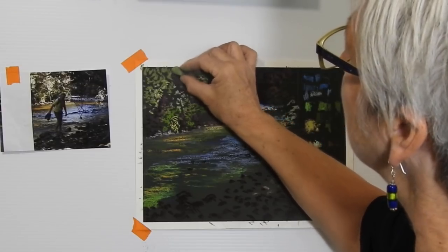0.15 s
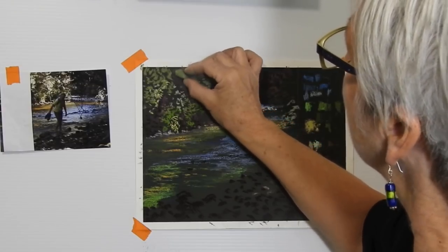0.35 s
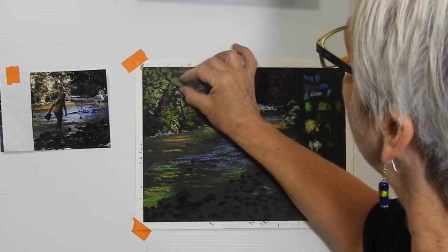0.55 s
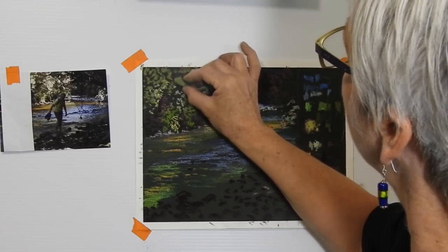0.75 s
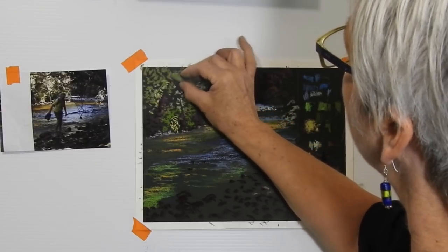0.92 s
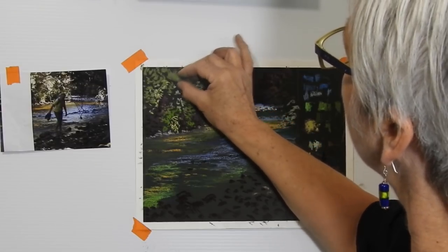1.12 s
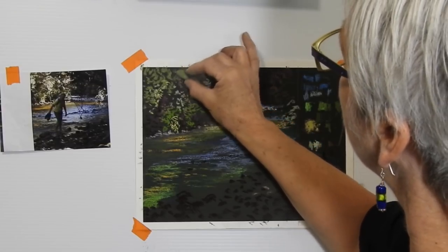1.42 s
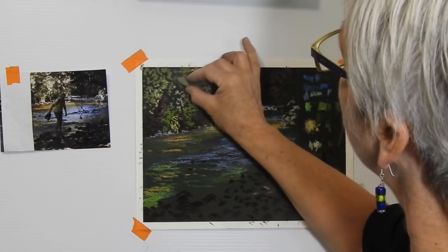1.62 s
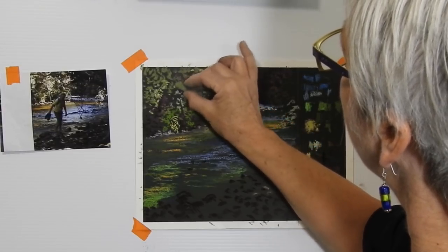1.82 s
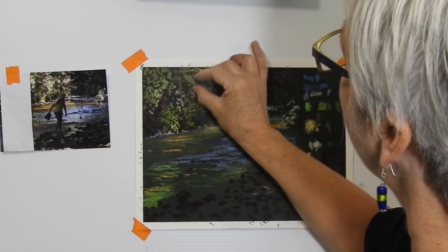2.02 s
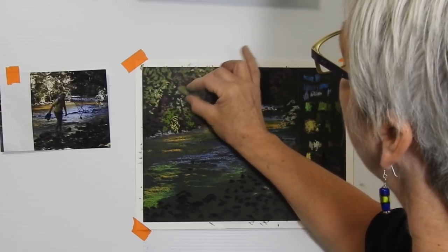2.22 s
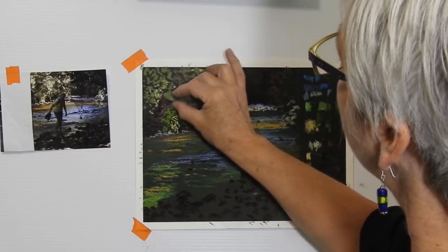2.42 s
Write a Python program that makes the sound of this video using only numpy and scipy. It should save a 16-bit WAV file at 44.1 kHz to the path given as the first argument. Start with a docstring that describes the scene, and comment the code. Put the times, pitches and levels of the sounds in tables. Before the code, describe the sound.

A pastel stick dabs and drags on paper fixed to an upright board, with irregular crisp ticks over soft hollow thumps, the sharpest midway; close microphone, small quiet room with low rumble.

```python
"""A soft pastel stick is dabbed and dragged on paper taped to an upright board, in a small quiet room.
A steady low rumble lies under it all; over it the hand rubs softly on the sheet, as noise of varying level.
Short catches and drags of chalk come throughout, each a run of tiny fractures on the tooth of the paper.
Among them, from about 0.4 s, the stick lands again and again: a click and crumble over a thump of ringing
board and fluttering sheet. A near surface mirrors the crisp sounds and the room adds a short tail;
the rub fades near the end."""
import sys
import numpy as np
from scipy import signal
from scipy.fft import rfft, irfft
from scipy.io import wavfile

SR = 44100
rng = np.random.default_rng(int(sys.argv[2]) if len(sys.argv) > 2 else 0)


def put_to_file(sound):
    """Save the sound as 16-bit audio at rate SR, in the file named by the first command-line argument."""
    columns = np.atleast_2d(sound).T  # one column per channel
    safe = np.clip(columns, -1, 1)
    whole_steps = np.round(safe * 32767)
    wavfile.write(sys.argv[1], SR, whole_steps.astype(np.int16))


N = 112454  # samples

# Colour of the left-right sum of the steady air: pitch_hz, relative level_db (per Hz)
AIR_COLOUR = [(20, -13), (35, -39), (58, -2.5), (80, -2.5), (120, -3), (165, 3.5), (205, 1), (255, -13.5),
              (400, -19.5), (700, -17.5), (1150, -19.5), (1600, -21), (3000, -22), (5600, -21),
              (8100, -23.5), (12000, -28), (16000, -44.5)]
# Likeness of left and right in the steady air: pitch_hz, correlation (0-1)
AIR_WIDTH = [(100, 0.84), (300, 0.41), (1000, 0), (3000, 0), (12000, 0)]
AIR_DB = -54  # RMS

# Level of the hand rubbing on the sheet, before its jerks: start_s, level_db
RUB_LEVEL = [(0, -67.5), (.19, -77.5), (0.234, -56), (.29, -72.5), (.35, -59.5), (.45, -62.5), (.5, -68),
             (.6, -65.5), (.75, -60), (.98, -63), (1.02, -69), (1.15, -63), (1.27, -64), (1.34, -72.5),
             (1.5, -63), (1.59, -57), (1.68, -59), (1.8, -57.5), (1.86, -63), (1.98, -62.5), (2.12, -62.5),
             (2.23, -54.5), (2.33, -75.5), (2.55, -82)]
# Colour of the rubbing: pitch_hz, relative level_db (per Hz)
RUB_TONE = [(35, -22), (65, 3.5), (150, 1.5), (245, -2.5), (310, 2), (400, -1), (530, -2.5), (700, -9),
            (1100, -9), (1500, -17), (3000, -23), (8000, -35.5)]
RUB_JERK_DB, RUB_JERKS_PER_S = 5.5, 70

# Likeness of left and right in the reflections: pitch_hz, correlation (0-1)
ROOM_WIDTH = [(110, 1), (280, 0.76), (550, 0.16), (1000, 0.5), (8000, 0.07)]
ROOM_T60_S, ROOM_GAP_S, EARLY_DB = 0.14, 0.0048, 5.5  # early level is relative to the tail
CHALK_ROOM_DB, CHALK_EARLY_T60_S = -1.5, 0.18
BOARD_ROOM_DB, BOARD_EARLY_T60_S = -4.5, 0.027

# Drags and short catches of the chalk: start_s, length_s (before the release), relative level_db,
# swell_db (from start to end), hiss_hz (centre of the hiss), rasp_db (boost below the hiss)
CHALK_STROKES = [(0.053, 0.0088, -42, 4, 8700, -6), (0.071, 0.045, -60, 0, 9500, 9),
                 (0.131, 0.0068, -44.5, -3, 8140, -7), (0.249, .038, -47, 5, 7600, 1.5),
                 (0.409, 0.011, -49, -8, 8500, 0), (.440, 0.0053, -50.5, -8, 7950, -3),
                 (0.5345, 0.0059, -42, -4, 8500, 6.5), (0.682, 0.0053, -50, -9, 8000, 5),
                 (0.708, 0.011, -49, 4, 8200, 5), (0.789, 0.0245, -53.5, 3, 8700, 9.5),
                 (.846, .009, -59.5, 0, 9000, -1), (0.909, .04, -62.5, -8, 8500, 2),
                 (0.957, 0.01, -50, 0, 7760, 6), (1.046, 0.05, -54.5, -11, 8740, 2),
                 (1.243, 0.039, -38, 9, 7970, -2.5), (1.596, 0.0051, -55, 0, 9800, -6),
                 (1.742, 0.0064, -51, -2, 7500, 16), (1.893, 0.028, -53.5, -19, 10400, -2),
                 (2.053, 0.019, -52, 7, 8000, 12), (2.137, 0.087, -50.5, 15, 8600, 10.5)]
# Colour of the chalk before hiss and rasp: pitch_hz, relative level_db (per Hz)
CHALK_COLOUR = [(400, -20.5), (1500, -16), (3600, -13.5), (4800, -8.5), (5800, -2.5), (7500, -3.5),
                (9200, 1.5), (10400, -7.5), (11500, -13.5), (16000, -34)]
DRAG_DB, DRAG_EDGE_S = -1, 0.0018
LEAN_IN = 0.25  # share of a drag over which the pressure builds
GRAINS_PER_S, GRAIN_SCATTER_DB, JUDDER_DB, JUDDERS_PER_S = 6100, 7.5, 3, 350
HISS_DB, HISS_OCTAVES, RASP_BELOW_HZ = 8, 0.41, 4000

MIRROR_S, MIRROR_DB, LEFT_LAG_S = 0.00172, -7.5, 0.000004

# Landings of the stick: start_s, relative tick_db, relative thump_db, thump tilt_db (per octave)
LANDINGS = [(.411, -26, -21, 1), (0.5384, -16, -9.5, -1.5), (0.685, -41, -18.5, -3), (.766, -42, -20.5, 0),
            (.793, -31, -18, 1.5), (.917, -40, -14, -1), (1.051, -18.5, -14, -2),
            (1.2097, -10.5, -14.5, -1), (1.5334, 3, -1.5, -2), (1.7271, -2.5, -3.5, -1),
            (1.768, -36, -16.5, 0.5), (1.891, -15, 1.5, -1), (2.0172, -18.5, -7, 0.4),
            (2.061, -23, -16.5, 3), (2.164, -20, -13, -1)]
# Colour of the tick: pitch_hz, relative level_db (per Hz)
TICK_COLOUR = [(800, -20), (2000, -15.5), (3500, -12), (5700, 3), (7500, 1.5), (9400, 1.5), (10800, -14.5),
               (13000, -24), (16000, -74)]
TICK_DB, CRUMBLE_DB, CRUMBLE_S = -11, -10, 0.00074  # crumble level is relative to the click

# Modes of the board before scatter and tilt: pitch_hz, relative level_db, t60_s
BOARD_MODES = [(79.5, -6, 0.11), (107, -3, 0.14), (143.4, -6, 0.13), (188, 3.5, 0.1), (216.5, -1.5, 0.054),
               (293.3, -6, 0.18), (456.5, 3, 0.039), (541.3, 0.5, 0.13), (643, -24, 0.13),
               (732, -4.5, 0.033), (967, -9.5, 0.024), (1102, -12, 0.11), (1296, -15, 0.095)]
# Colour of the fluttering sheet before tilt: pitch_hz, relative level_db (per Hz)
FLUTTER_COLOUR = [(35, -30.5), (70, 0), (125, -5.5), (200, -1.5), (370, -6.5), (530, -3), (800, -8.5),
                  (1400, -16), (2000, -20.5), (3000, -20.5), (8000, -41)]
BOARD_DB, BOARD_RISE_S, BOARD_LAG_S = -33.5, 0.0032, 0.001005
MODE_SCATTER_DB, MODE_SCATTER = 2, 0.007  # spread of level, and of pitch as a share
FLUTTER_DB, FLUTTER_T60_S = -10, 0.11
PIVOT_HZ = 400  # the tilt leaves this pitch alone

TOP_HZ = 15900


def undb(db):
    """Turn decibels into a gain."""
    return 10 ** (np.asarray(db) / 20)


def unit(x):
    """Scale to an energy of one."""
    return x / np.sqrt(np.sum(x ** 2, axis=-1, keepdims=True) + 1e-20)


def along(points, hz):
    """Read a table on a log-frequency axis."""
    p = np.array(points)
    return np.interp(np.log(hz + 1), np.log(p[:, 0]), p[:, 1])


def response(points, size=4096):
    """Causal (minimum-phase) impulse response of a colour, with unit energy."""
    gain = undb(along(points, np.fft.rfftfreq(size, 1 / SR)))
    cepstrum = irfft(np.log(gain))
    cepstrum[1:size // 2] *= 2
    cepstrum[size // 2 + 1:] = 0
    return unit(irfft(np.exp(rfft(cepstrum))))


def through(x, h):
    """Convolve and keep at most the length of the scene."""
    return signal.fftconvolve(x, h)[:N]


def fade(t60):
    """Exponential decay that falls 60 dB in t60 seconds."""
    return np.exp(-np.log(1000) * np.arange(N) / SR / t60)


def add(out, s, x):
    """Mix a sound in at a time in seconds."""
    i = int(s * SR)
    out[i:i + len(x)] += x[:max(N - i, 0)]


def pair(likeness):
    """Left and right noise with a given correlation at each frequency."""
    c = np.clip(likeness, 0, 1)
    mid, side = rfft(rng.standard_normal((2, N)))
    shared = np.sqrt((1 + c) / 2) * mid
    opposed = np.sqrt((1 - c) / 2) * side * np.array([[1], [-1]])
    return irfft(shared + opposed, N)


def jitter(rate):
    """Random values joined by straight lines, so many a second."""
    return np.interp(np.arange(N) / SR * rate, np.arange(N), rng.standard_normal(N))


def air():
    """Steady low rumble of the room, with a thin wide hiss above it: noise shaped in colour and width."""
    hz = np.fft.rfftfreq(N, 1 / SR)
    likeness = along(AIR_WIDTH, hz)
    # like channels add up more strongly, so they are turned down to keep the colour of the sum
    gain = undb(along(AIR_COLOUR, hz)) / np.sqrt(1 + likeness)
    noise = irfft(rfft(pair(likeness)) * gain, N)
    return undb(AIR_DB) * noise / np.std(noise)


def rub():
    """The hand shifts over the sheet in soft jerks: coloured noise with a randomly wavering level."""
    level_db = np.interp(np.arange(N) / SR, *np.array(RUB_LEVEL).T)
    level_db = level_db + RUB_JERK_DB * jitter(RUB_JERKS_PER_S)
    return through(undb(level_db) * rng.standard_normal(N), response(RUB_TONE))


def room(x, early_t60):
    """Dense early reflections and a short tail: decaying stereo noise as an impulse response."""
    decay = fade(ROOM_T60_S) + undb(EARLY_DB) * fade(early_t60)
    shape = decay * (np.arange(N) / SR > ROOM_GAP_S)
    noise = pair(along(ROOM_WIDTH, np.fft.rfftfreq(N, 1 / SR)))
    return np.array([through(x, h) for h in unit(noise * shape)])


def chalk_grains():
    """Tiny fractures: random clicks of either sign, uneven in level and juddering."""
    breaks = rng.random(N) < GRAINS_PER_S / SR
    grains = breaks * rng.choice([-1, 1], N)
    scatter_db = GRAIN_SCATTER_DB * rng.standard_normal(N)
    return grains * undb(scatter_db + JUDDER_DB * jitter(JUDDERS_PER_S))


def drag_colour(hiss_hz, rasp_db):
    """Chalk colour with a hump of hiss around one pitch and the rasp below it raised or lowered."""
    colour = []
    for f, db in CHALK_COLOUR:
        hiss = HISS_DB * np.exp(-(np.log2(f / hiss_hz) / HISS_OCTAVES) ** 2)
        colour.append((f, db + hiss + rasp_db * (f < RASP_BELOW_HZ)))
    return colour


def drags():
    """Chalk breaks off in dense grains while the stick judders over the tooth of the paper."""
    out = np.zeros(N)
    grains = chalk_grains()
    for s, length, db, swell_db, hiss_hz, rasp_db in CHALK_STROKES:
        end = length + 2 * DRAG_EDGE_S
        t = np.arange(int(end * SR)) / SR
        press = np.interp(t, [0, LEAN_IN * length, length, end], [0, 1, 1, 0])
        press = press * undb(swell_db * t / length)
        run = unit(press * grains[int(s * SR):][:len(t)])
        run = run * np.sqrt(length * SR)  # energy grows with length
        add(out, s, undb(db + DRAG_DB) * through(run, response(drag_colour(hiss_hz, rasp_db))))
    return out


def mirrored(x):
    """A near surface repeats the crisp sound; it reaches the left channel slightly late."""
    turn = -2j * np.pi * np.fft.rfftfreq(N, 1 / SR)  # phase turn per second of delay
    near = rfft(x) * (1 + undb(MIRROR_DB) * np.exp(turn * MIRROR_S))
    return irfft(np.array([near * np.exp(turn * LEFT_LAG_S), near]), N)


def ticks():
    """The hard tip meets the paper: one click and a moment of crumbling, as decaying noise."""
    out = np.zeros(N)
    t = np.arange(SR // 50) / SR
    dusts = rng.standard_normal((len(LANDINGS), len(t)))
    for (s, db, _, _), dust in zip(LANDINGS, dusts):
        click = undb(CRUMBLE_DB) * unit(dust * np.exp(-t / CRUMBLE_S))
        click[0] += 1
        add(out, s, undb(db + TICK_DB) * click)
    return through(out, response(TICK_COLOUR))


def thumps():
    """Each landing rings the board's modes, a little differently each time, and flutters the sheet."""
    size = SR // 2
    out, t = np.zeros(N), np.arange(size) / SR
    rise = 1 - np.exp(-t / BOARD_RISE_S)
    dying = fade(FLUTTER_T60_S)[:size]
    modes = np.array(BOARD_MODES)
    mode_hz, mode_db = modes[:, 0], modes[:, 1]
    signs = (-1) ** np.arange(len(modes))[:, None]  # neighbouring modes start in opposite directions
    decays = np.exp(-np.log(1000) * t / modes[:, 2:]) * signs
    spots = rng.standard_normal((len(LANDINGS), 2, len(modes)))
    noises = rng.standard_normal((len(LANDINGS), size))
    for (s, _, db, tilt), spot, noise in zip(LANDINGS, spots, noises):
        tones = np.sin(2 * np.pi * np.outer(mode_hz * (1 + MODE_SCATTER * spot[0]), t))
        tilted_db = mode_db + tilt * np.log2(mode_hz / PIVOT_HZ)
        ring = undb(BOARD_DB + tilted_db + MODE_SCATTER_DB * spot[1]) @ (tones * decays)
        paper = response([(f, d + tilt * np.log2(f / PIVOT_HZ)) for f, d in FLUTTER_COLOUR])
        flutter = undb(FLUTTER_DB) * through(unit(noise * dying), paper)[:size]
        blow = (ring + flutter) * rise
        add(out, s + BOARD_LAG_S, undb(db) * blow)
    return out


def scene():
    """Chalk and board, close by, in the room."""
    chalk = mirrored(ticks() + drags())
    board = thumps() + rub()
    chalk_tail = undb(CHALK_ROOM_DB) * room(chalk[1], CHALK_EARLY_T60_S)
    board_tail = undb(BOARD_ROOM_DB) * room(board, BOARD_EARLY_T60_S)
    return chalk + board + chalk_tail + board_tail + air()


def record(dry):
    """A steep elliptic low-pass cuts the top."""
    return signal.sosfilt(signal.ellip(8, 0.2, 70, TOP_HZ, fs=SR, output="sos"), dry)


dry = scene()
out = record(dry)
put_to_file(out)
```